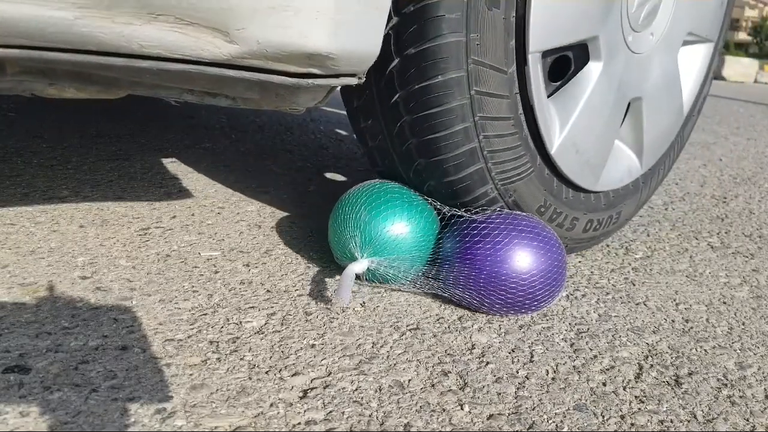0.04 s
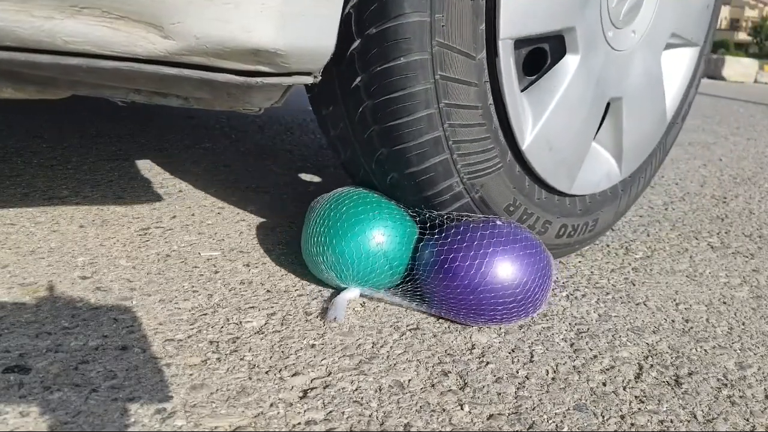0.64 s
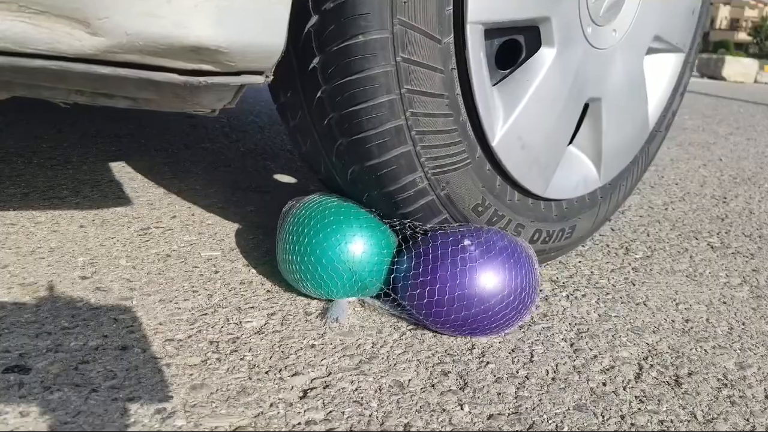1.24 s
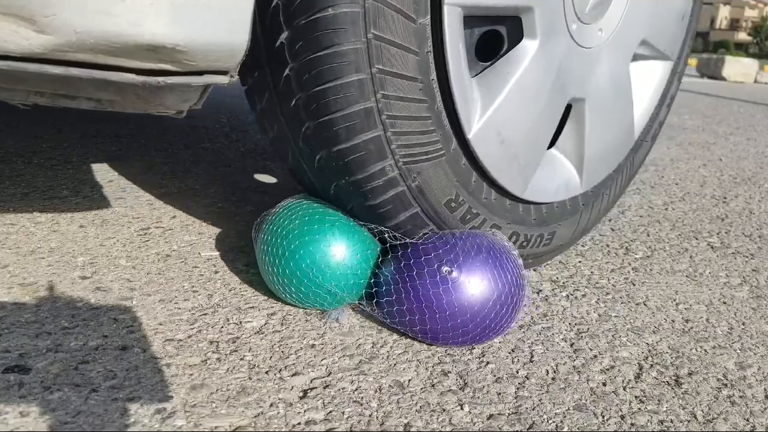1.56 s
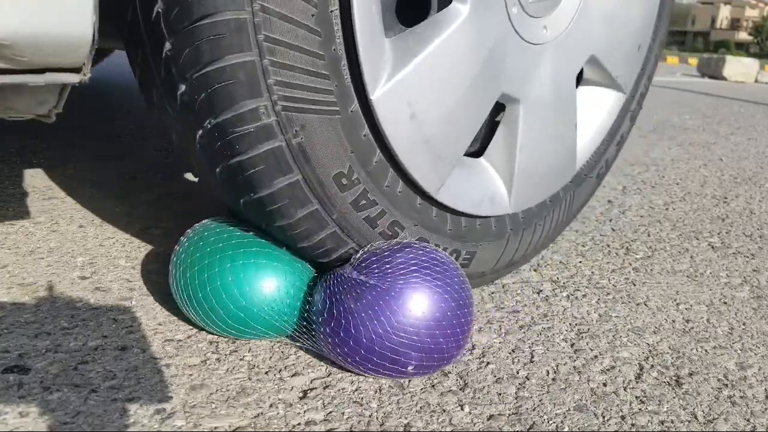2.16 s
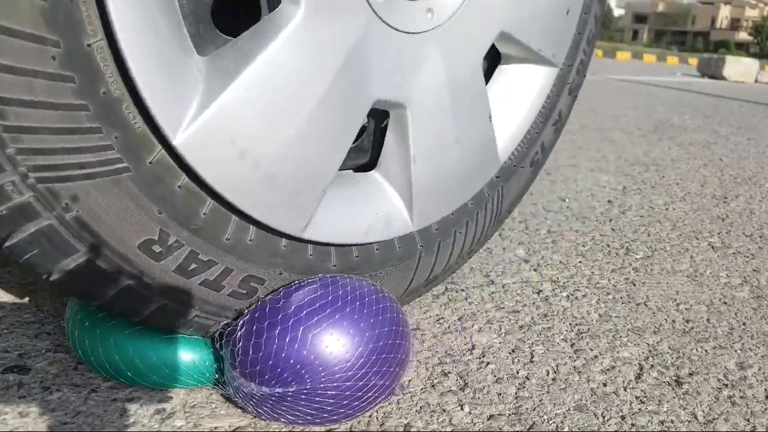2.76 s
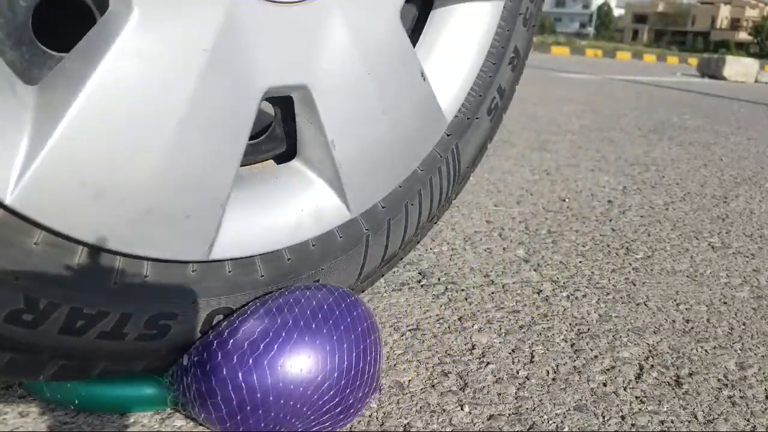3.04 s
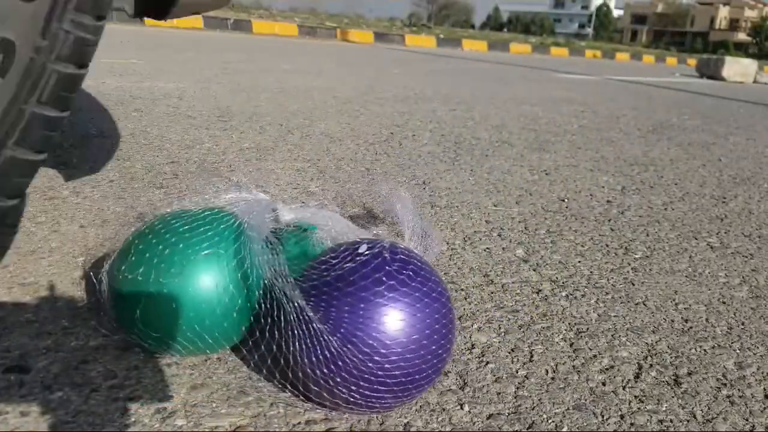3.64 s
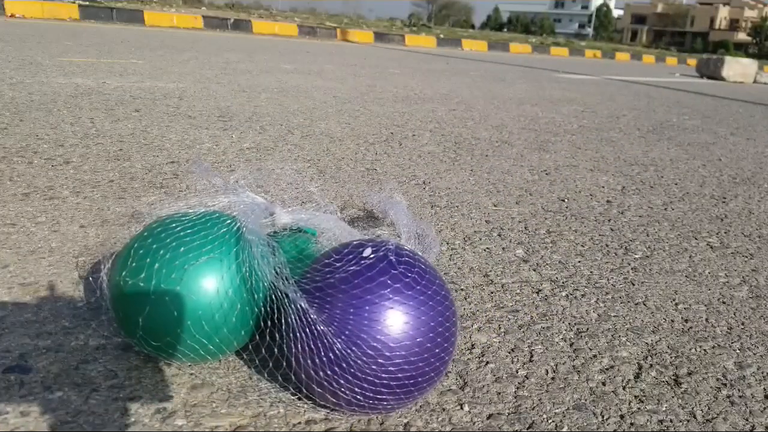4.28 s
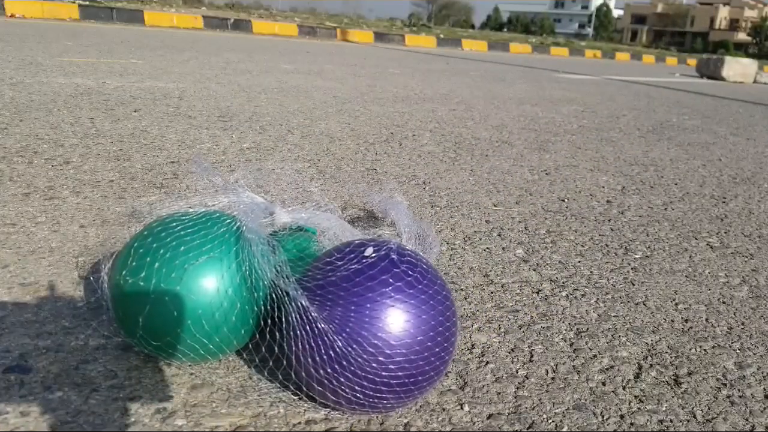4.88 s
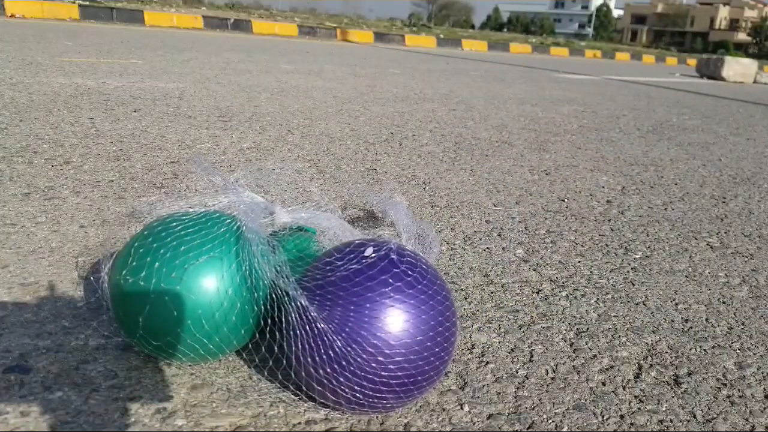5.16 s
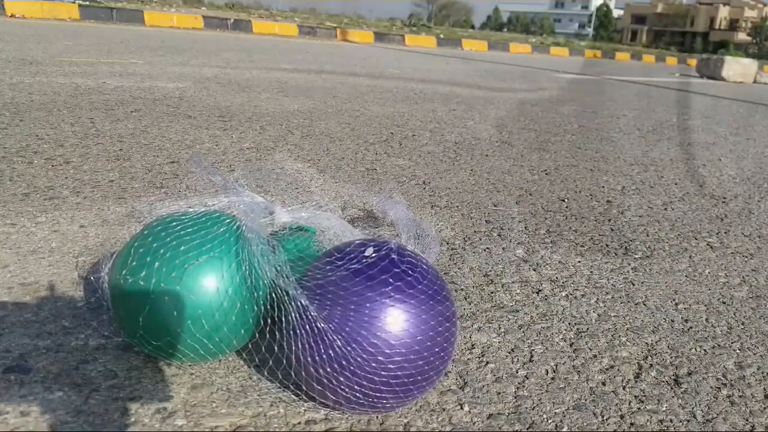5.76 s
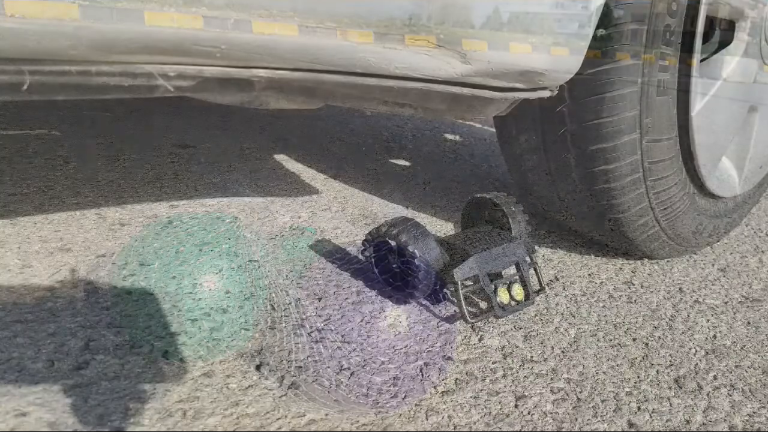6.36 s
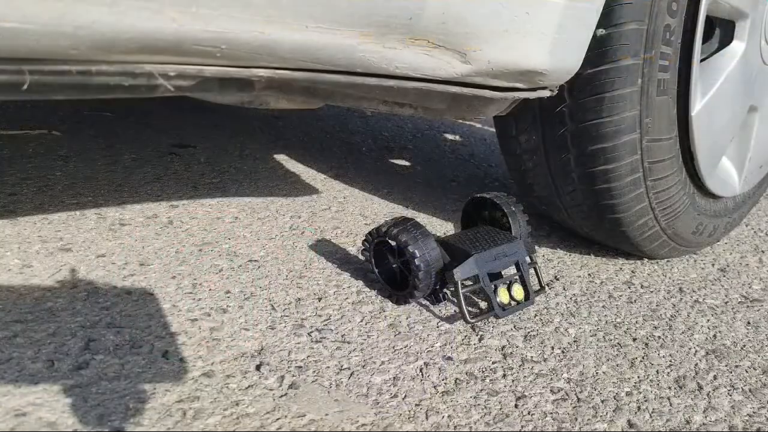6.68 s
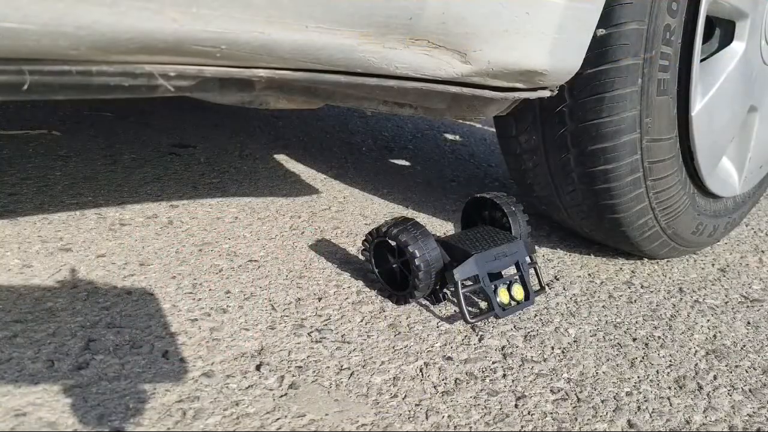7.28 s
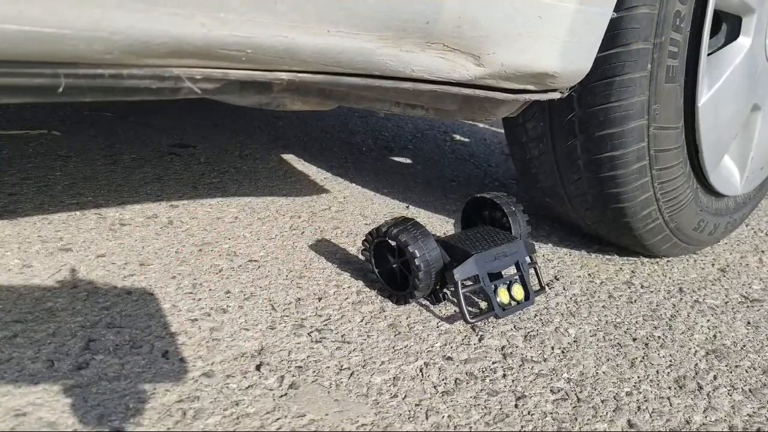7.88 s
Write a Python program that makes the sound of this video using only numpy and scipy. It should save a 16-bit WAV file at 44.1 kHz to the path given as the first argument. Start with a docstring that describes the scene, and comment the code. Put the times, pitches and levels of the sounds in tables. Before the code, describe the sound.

Close to a wheel on an outdoor road, sand and small stones crunch under a slowly rolling tyre over a low engine hum. Rubbery creaks lead to one sharp bang as a ball bursts, then a quick run of dry snaps from breaking netting. After a lull, the brakes squeak, the tyre scuffs, a few low thumps sound and loose metal clanks while the engine idles. Soft gusts brush the stereo microphones.

```python
"""Car rolling onto a net of toy balls

Outdoors on gritty asphalt, a stereo pair close to the tyre, light air on the microphones.
A car creeps up, grit crackling under the tread; one ball creaks and bursts, and the net snaps
strand by strand. The engine drops to idle; a pebble clicks, the brakes squeak, the tyre scuffs,
a few dull thumps sound and loose metal clanks."""
import sys
import numpy as np
from scipy import signal
from scipy.fft import rfft, irfft, next_fast_len
from scipy.io import wavfile

SR = 44100
rng = np.random.default_rng(int(sys.argv[2]) if len(sys.argv) > 2 else 0)


def inscribe(sig):
    """Save sig as 16-bit PCM at rate SR to the path in sys.argv[1].

    A 1-D sig is mono; a 2-D sig holds one channel per row.
    Samples are clipped to [-1, 1] before scaling.
    """
    pcm = np.round(np.clip(np.atleast_2d(sig).T, -1, 1) * 32767)
    wavfile.write(sys.argv[1], SR, pcm.astype(np.int16))


N = 353682
TIME = np.arange(N) / SR
CAR_LEAD_S = 0.000422   # the car's sound reaches the left microphone first
TYRE_LEAD_S = 0.00005   # the tyre meets the balls almost straight ahead

# spectra of cracking grit, a blast at the wheel arch and a dry snap: f/Hz, level/dB
GRIT_SPECTRUM = [(650, -31), (1100, -7), (1570, -3.5), (2150, -2), (2800, -5), (4100, -4), (4900, -1.5),
                 (6000, -9.5), (7300, -13), (8430, -20), (11400, -11.5), (13000, -13), (14500, -22.5),
                 (15500, -41.5)]
BLAST_SPECTRUM = [(59, -35), (100, -13), (150, -7), (220, -11), (333, -8), (411, -4), (600, -12),
                  (727, -4.5), (970, -5.5), (1250, -14), (1800, -10), (2090, -14.5), (6530, -30),
                  (8770, -49.5), (12300, -30.5), (15500, -57.5)]
SNAP_SPECTRUM = [(210, -28), (350, -11), (1030, -2), (2390, -1.5), (4720, -13.5), (5890, -13),
                 (8900, -28.5), (12400, -24.5), (15500, -44)]


def amp(db):
    """Decibels to gain."""
    return 10 ** (np.asarray(db) / 20)


def unit_power(x):
    """Scale to an RMS of one."""
    return x / np.sqrt(np.mean(x ** 2) + 1e-20)


def in_time(points):
    """Read a curve at every sample."""
    return np.interp(TIME, *np.transpose(points))


def between(start, end, fade_s):
    """One inside a span, fading to zero outside."""
    return np.clip(np.minimum(TIME - start, end - TIME) / fade_s + 1, 0, 1)


def at_hz(points, hz):
    """Read a spectrum on a log-frequency axis."""
    f, value = np.transpose(points)
    return np.interp(np.log(hz), np.log(f), value)


def bin_hz(n):
    """Frequencies of an n-point spectrum, 1 Hz at least."""
    return np.maximum(np.arange(n // 2 + 1) * SR / n, 1)


def drift(per_s):
    """Random wander of unit power."""
    knots = rng.standard_normal(int(N / SR * per_s) + 2)
    return unit_power(np.interp(TIME * per_s, np.arange(len(knots)), knots))


def coloured(x, spectrum, tilt_db=0, size=4096):
    """Causal filter of unit energy, tilted per octave and steep below the spectrum's lowest point."""
    hz = bin_hz(size)
    skirt_db = np.clip(24 * np.log2(hz / spectrum[0][0]), -50, 0)
    cepstrum = irfft(np.log(amp(at_hz(spectrum, hz) + skirt_db + tilt_db * np.log2(hz))))
    response = irfft(np.exp(rfft(2 * cepstrum[:size // 2], size)))
    response /= np.sqrt(np.sum(response ** 2))
    return signal.oaconvolve(x, response[None], axes=1)[:, :x.shape[1]]


def spread(paths, lead_s):
    """Three unrelated signals to the pair: one direct, early on the left, and two scattered."""
    common_power = [(60, 0.79), (300, 0.86), (700, 0.38), (2000, 0.49), (12000, 0.28)]   # what both microphones share: f/Hz, fraction of power
    n = next_fast_len(paths.shape[1], real=True)
    hz, bins = bin_hz(n), rfft(paths, n)
    share = np.clip(at_hz(common_power, hz), 0, 1)
    direct = bins[0] * np.exp(-2j * np.pi * hz * lead_s * np.arange(2)[:, None])
    return irfft(np.sqrt(share) * direct + np.sqrt(1 - share) * bins[1:], n)[:, :paths.shape[1]]


def grains(per_s, size_db, count=N, lead_s=CAR_LEAD_S):
    """Stereo stream of tiny fractures of uneven size; unit power."""
    born = rng.random((3, count)) < per_s / SR
    sizes = amp(size_db * np.minimum(rng.exponential(1, (3, count)), 4))
    return unit_power(spread(born * sizes * rng.choice([-1, 1], (3, count)), lead_s))


def noise(lead_s, count=N):
    """Smooth stereo noise."""
    return spread(rng.standard_normal((3, count)), lead_s)


def click(lead_s, count):
    """One sharp stereo pulse, early on the left."""
    return 1.0 * (np.arange(count) == np.round(lead_s * SR * np.arange(2)[:, None]))


def resonate(x, hz, width_hz):
    """One resonance, of gain one at its top."""
    return signal.lfilter(*signal.iirpeak(hz, hz / width_hz, fs=SR), x + 1e-18)


def ring(x, hz, width_hz):
    """One resonance that keeps the power of a broad sound."""
    return resonate(x, hz, width_hz) * np.sqrt(SR / (np.pi * width_hz))


def hollow(x, reflection):
    """The gap between tyre and road returns a sound after about a millisecond."""
    lag = round(rng.uniform(.0007, .0014) * SR)
    return signal.lfilter([np.sqrt(1 - reflection ** 2)], np.r_[1, np.zeros(lag - 1), reflection], x)


def add(out, s, sound):
    """Mix a sound in at a time."""
    i = round(s * SR)
    out[:, i:i + sound.shape[1]] += sound[:, :N - i]


def lull(sink_s, recover_s, from_s=2.555, to_s=3.72):
    """Depth, 0-1, to which the engine's sound sinks after the burst before it swells back."""
    return np.clip(np.minimum((TIME - from_s) / sink_s, 1 - (TIME - to_s) / recover_s), 0, 1)


def engine(idle_hz=14.8, pipe_hz=130, pipe_width_hz=9, pipe_db=2.0, lumpy_db=2.3, throb=0.089):
    """Firing orders swell as they pass the exhaust resonance, over uneven rumble and bay hiss."""
    crank_rate = [(0.0, 16.6), (0.55, 16.4), (0.79, 19.3), (0.96, 20), (1.21, 24.2), (1.5, 25.2),
                  (1.8, 24.8), (2.3, 23), (4.55, 21.3), (5.0, 18.3), (5.55, 14.7), (6.8, 15), (7.5, 14.8),
                  (8.0, 16)]   # crankshaft turns: t/s, rate/Hz
    firing_orders = [(2, -9.5), (3, -8.5), (4, -11.5), (5, -15), (6, -7), (8, -15), (9, -5.5), (11, -16.5),
                     (12, -10), (18, -16.5)]   # engine tones: multiple of the crank rate, level/dB
    rumble_spectrum = [(18, -36), (30, -15), (135, 1), (211, -5.5), (248, -14), (302, -6.5), (400, -19),
                       (520, -35.5), (880, -120)]   # low engine noise: f/Hz, level/dB
    bay_spectrum = [(150, -25), (250, -3.5), (340, -11), (525, -4), (692, -4.5), (1480, -12.5), (2020, -13),
                    (2760, -15.5), (4790, -14.5), (8320, -36.5), (12400, -26), (14200, -36), (15500, -53)]   # engine bay hiss: f/Hz, level/dB
    crank_hz = in_time(crank_rate)
    turn = 2 * np.pi * np.cumsum(crank_hz * (1 + .009 * drift(14))) / SR
    firing = np.sin(2 * turn)
    orders = 0
    for k, db in firing_orders:
        resonance_db = pipe_db / (1 + ((k * crank_hz - pipe_hz) / pipe_width_hz) ** 2)
        strength = amp(db + resonance_db + lumpy_db * drift(8.7))
        orders = orders + strength * np.sin(k * turn + rng.uniform(0, 2 * np.pi))
    rumble = coloured(noise(0), rumble_spectrum) * amp(-4 + lumpy_db * drift(12))
    hiss = coloured(noise(CAR_LEAD_S), bay_spectrum) * (1 + throb * firing)
    # the drone grows with engine speed and fades slowly throughout
    speed_db = 7.5 * np.log2(crank_hz / idle_hz)
    drone_db = -47 + speed_db - 0.39 * TIME - 16.5 * lull(sink_s=0.48, recover_s=0.8)
    bay_db = -60 + 1.113 * TIME - 12.5 * lull(sink_s=1.27, recover_s=0.74)
    tailpipe = amp(-54) * firing * between(4.23, 5.4, fade_s=0.3)   # heard once the wheel has passed
    return amp(drone_db) * (rumble + amp(-0.5) * orders) + amp(bay_db) * hiss + tailpipe


def crackle(lead_s, clump_db=1.8):
    """Sand cracks under the tread; the rubber gives a duller crunch in the same clumps."""
    tread_spectrum = [(190, -20.5), (330, -3), (736, -2.5), (805, -1.5), (1150, -8.5), (1700, -14.5),
                      (2210, -30.5), (3740, -120)]   # crunch of the rubber: f/Hz, level/dB
    sand = coloured(grains(per_s=2600, size_db=2.8, lead_s=lead_s), GRIT_SPECTRUM)
    rubber = coloured(grains(per_s=2600, size_db=2.8, lead_s=lead_s), tread_spectrum)
    return (sand + amp(-1) * rubber) * amp(clump_db * drift(90))


def rolling(climb_s=2.6):
    """Grit crackles under the car, swelling with each tread block, until the tyre climbs the ball."""
    roll_level = [(0, -57), (0.6, -55.5), (1.15, -50), (2.5, -49.5)]   # steady crackle as the car gathers speed: t/s, level/dB
    bites = [(0.767, -45, 0.047), (1.033, -50, 0.048), (1.243, -50.5, 0.057), (1.454, -45.5, 0.063),
             (1.714, -42.5, 0.072), (1.85, -44.5, 0.046), (2.025, -40, 0.049), (2.2, -37.5, 0.043),
             (2.375, -37.5, 0.059), (2.521, -38.5, 0.047)]   # blocks of the near tyre biting in: t/s, level/dB, half length/s
    bite_power = sum(amp(2 * db) * np.exp(-2 * ((TIME - s) / half_s) ** 2) for s, db, half_s in bites)
    steady = amp(in_time(roll_level)) * crackle(CAR_LEAD_S)
    near = np.sqrt(bite_power) * crackle(TYRE_LEAD_S)
    return (steady + near) * between(0, climb_s, fade_s=0.084)


def breeze(band_hz=(31, 90), flutter_db=5.5):
    """Light air buffets the microphones in a few soft gusts."""
    gusts = [(0.095, -53, 0.46), (0.877, -49.5, 0.17), (5.2, -53, 0.4)]   # puffs of air: t/s, level/dB, half length/s
    buffet = signal.sosfilt(signal.butter(2, band_hz, "band", fs=SR, output="sos"), noise(0))
    swell = sum(amp(db) / (1 + ((TIME - s) / half_s) ** 4) for s, db, half_s in gusts)
    return unit_power(buffet) * swell * amp(flutter_db * drift(14))


def stones(crack_db=17, t60=0.031, count=2500):
    """Larger stones split: one crack and a quick run of smaller ones, ringing at the stone's pitch."""
    splits = [(0.746, -32, 4520), (1.0388, -33, 2340), (1.1945, -31, 4790), (1.2548, -30, 4850),
              (1.3965, -30.5, 2480), (1.464, -27.5, 3800), (1.6714, -26.5, 5070), (1.7198, -29, 4780),
              (1.7542, -25.5, 4640), (1.8206, -26.5, 3910), (1.851, -25, 3580), (1.9543, -32, 2270),
              (1.9725, -29.5, 4550), (2.0238, -17.5, 2620), (2.1118, -33.5, 3720), (2.1476, -28, 2300),
              (2.1613, -25, 1900), (2.2044, -24, 2600), (2.3094, -29, 1560)]   # stones under the tread: t/s, level/dB, f/Hz
    out, t = np.zeros((2, N)), np.arange(count) / SR
    for s, db, hz in splits:
        run = grains(per_s=6000, size_db=1.5, count=count, lead_s=TYRE_LEAD_S) * amp(-60 * t / t60)
        split = run + amp(crack_db) * click(TYRE_LEAD_S, count)
        sand = amp(-3) * coloured(split, GRIT_SPECTRUM, tilt_db=-0.7)
        tone = amp(-6) * ring(resonate(split, hz, hz), hz, hz / 2)
        add(out, s, amp(db - 8.5) * hollow(sand + tone, reflection=0.32))
    return out


def creaks(jolt_db=10, skin_db=16.5, count=12000):
    """The squeezed ball lets go with a jolt that rings its taut skin, then runs on in stick and slip."""
    jolts = [(1.463, -32.5, 0.05, 912), (2.402, -23.5, 0.05, 1090), (2.409, -24.5, 0.025, 945),
             (2.483, -25.5, 0.017, 2090), (2.492, -24, 0.2, 430), (2.517, -17, 0.093, 840),
             (2.5278, -19.5, 0.052, 749), (2.538, -18, 0.073, 1030), (2.560, -23, 0.12, 1000)]   # the ball slipping under the tread: t/s, level/dB, t60/s, skin f/Hz
    creak_spectrum = [(88, -38), (150, -9), (221, -8.5), (400, -5.5), (560, -8), (736, -5.5), (1040, 1),
                      (1400, -16), (1910, -10), (2600, -16.5), (4930, -15), (8830, -35.5), (12800, -26.5),
                      (15500, -54)]   # rubbing skin: f/Hz, level/dB
    out, t = np.zeros((2, N)), np.arange(count) / SR
    jolt = click(TYRE_LEAD_S, count)
    for s, db, t60, hz in jolts:
        slips = grains(per_s=3000, size_db=3.5, count=count, lead_s=TYRE_LEAD_S) * amp(-60 * t / t60)
        rub = coloured(slips + amp(jolt_db) * jolt, creak_spectrum)
        skin = amp(skin_db) * ring(jolt, hz, width_hz=170)
        add(out, s, amp(db - 0.5) * (rub + skin))
    return out * between(0, 2.582, fade_s=.006)


def burst(at_s=2.5995, taut_hz=1150, slack_hz=410, sag_s=0.0034, echo_s=0.028, echo_width_s=0.023,
          blast_t60=0.05, skin_t60=0.051, tail_t60=0.37, count=22000):
    """The skin tears and flaps lower as it slackens; the blast rings the wheel arch and dies dull."""
    arch_modes = [(400, 5, 0.14), (543, -6, 0.17), (636, -8.5, 0.22), (742, -5, .18), (900, -9, 0.2),
                  (1018, -6, 0.22), (1179, -8, 0.16), (1390, -13, 0.25), (1809, -8, 0.22)]   # wheel arch and tyre: f/Hz, level/dB, t60/s
    out, t = np.zeros((2, N)), np.arange(count) / SR
    crack = amp(13.5) * (t == 0)
    air = noise(TYRE_LEAD_S, count) * amp(-4 - 60 * t / blast_t60)
    blast = coloured(crack + air, BLAST_SPECTRUM)
    flap_hz = slack_hz + (taut_hz - slack_hz) * np.exp(-(t / sag_s) ** 2)
    skin = np.sin(2 * np.pi * np.cumsum(flap_hz) / SR) * amp(-2 - 60 * t / skin_t60)
    arch = sum(np.sin(2 * np.pi * hz * t) * amp(db - 20 - 60 * t / t60) for hz, db, t60 in arch_modes)
    echo_swell = amp(-21) * np.exp(-((t - echo_s) / echo_width_s) ** 2)
    underbody_echo = coloured(noise(CAR_LEAD_S / 2, count) * echo_swell, BLAST_SPECTRUM)
    tail = coloured(noise(0, count) * amp(-24.5 - 60 * t / tail_t60), BLAST_SPECTRUM, tilt_db=-3.5)
    pan = amp([[2], [-2]])   # the tear is left of the wheel
    add(out, at_s, (blast + skin) * pan + arch + underbody_echo + tail)
    return out


def net_snaps(recoil=0.22, recoil_s=.0008, t60=0.064, lead_s=0.00015, count=8000):
    """Each strand parts with a sharp pulse, its recoil and a short scatter between tyre and road."""
    strands = [(2.817, -49, 7), (2.8657, -16, -1.7), (2.920, -28.5, -1), (2.9401, -24.5, 0),
               (2.9616, -29, 2), (2.977, -27, 0.5), (3.0032, -25.5, 2), (3.0058, -27.5, -0.5),
               (3.0488, -29.5, 0.5), (3.064, -30.5, 1), (3.0952, -30.5, 0.5)]   # strands breaking: t/s, level/dB, tilt/(dB per octave)
    out, t = np.zeros((2, N)), np.arange(count) / SR
    crack = amp(15.5) * click(lead_s, count)
    pulse = crack - recoil * np.roll(crack, round(recoil_s * SR), axis=1)
    for s, db, tilt_db in strands:
        scatter = noise(lead_s, count) * amp(-9.3 - 60 * t / t60)
        snap = coloured(pulse + scatter, SNAP_SPECTRUM, tilt_db)
        add(out, s, amp(db) * hollow(snap, reflection=0.3))
    return out


def scuffs(t60=0.14, rattle_db=3.5, count=12000):
    """The tyre drags a little sand: a rattling run of grains that sets the tyre ringing."""
    drags = [(3.285, -53, 0.065, 0.08, -1.5), (5.124, -63, 0.018, 0.071, 5),
             (5.395, -51, 0.016, 0.064, -0.5), (5.425, -37.5, 0.0063, 0.066, -3.0),
             (6.828, -44, 0.0022, 0.012, -0.5), (7.057, -50.5, 0.0046, 0.016, -4.5),
             (7.324, -43, 0.004, 0.011, -2), (7.601, -41, 0.0025, 0.005, -3)]   # tyre on grit: t/s, level/dB, rise/s, length/s, tilt/(dB per octave)
    scuff_spectrum = [(120, -26), (200, -12), (812, -13.5), (3610, -14.5), (4030, -12), (5200, -16.5),
                      (6200, -20), (7480, -21), (9140, -25.5), (13200, -14), (15500, -36)]   # dragged sand: f/Hz, level/dB
    tyre_modes = [(810, 6.5, 49), (4100, -5.5, 130)]   # resonances of the tyre: f/Hz, level/dB, width/Hz
    out, t = np.zeros((2, N)), np.arange(count) / SR
    for s, db, rise_s, length_s, tilt_db in drags:
        decay_db = 60 * np.maximum(t - length_s, 0) / t60
        drag = np.minimum(t / rise_s, 1) * amp(db - decay_db + rattle_db * drift(256)[:count])
        sand = grains(per_s=4000, size_db=-0.5, count=count) * drag
        rings = sum(amp(mode_db) * resonate(sand, hz, width) for hz, mode_db, width in tyre_modes)
        add(out, s, hollow(coloured(sand + rings, scuff_spectrum, tilt_db), reflection=0.34))
    return out


def hum(hz=129.2, waver_db=2.5):
    """A low note that wavers in strength while the car slows."""
    phase = 2 * np.pi * hz * (TIME - CAR_LEAD_S * np.arange(2)[:, None])
    return np.sin(phase) * amp(-47 + waver_db * drift(23)) * between(4.26, 5.1, fade_s=0.13)


def pebble(at_s=4.5595, bounce_s=0.0022, t60=0.05, count=3000):
    """A hard click, as of a pebble shot from under the tyre, with a dull note from the wheel arch."""
    out, t = np.zeros((2, N)), np.arange(count) / SR
    strike = amp(24) * click(CAR_LEAD_S, count)
    bounce = 0.45 * np.roll(strike, round(bounce_s * SR), axis=1)
    scatter = noise(CAR_LEAD_S, count) * amp(-5 - 60 * t / t60)
    blow = strike + bounce + scatter
    snap = ring(coloured(blow, SNAP_SPECTRUM), hz=2950, width_hz=900) / 2
    arch = amp(-3) * coloured(blow, BLAST_SPECTRUM)
    add(out, at_s, amp(-37) * (snap + arch))
    return out


def brakes(attack_s=0.011, release_s=0.036, waver_hz=14, chatter_db=3.0, count=14000):
    """A pad sings on its disc: each note slides up or holds its pitch, chatters and lets go."""
    # squeaks: t/s, length/s, starting f/Hz, rise/(Hz per s), fundamental/dB, third harmonic/dB
    squeaks = [(4.6, 0.19, 2479, 0, -62, -90), (5.289, 0.029, 2095, 2400, -39.5, -61),
               (5.345, 0.052, 2142, 0, -62, -52.5), (7.366, 0.03, 2060, 2400, -38, -64),
               (7.43, 0.19, 2134, 0, -56, -64.5), (7.43, 0.13, 5255, 0, -64.5, -120)]
    out, t = np.zeros((2, N)), np.arange(count) / SR
    for s, length_s, pitch_hz, rise, low_db, high_db in squeaks:
        hz = pitch_hz + rise * t + waver_hz * drift(297)[:count]
        phase = 2 * np.pi * (np.cumsum(hz) / SR - pitch_hz * CAR_LEAD_S * np.arange(2)[:, None])
        low = np.sin(phase) + amp(-12) * np.sin(2 * phase)
        high = np.sin(3 * phase) + amp(-14) * np.sin(4 * phase) + amp(-3.5) * np.sin(6 * phase)
        low *= amp(low_db + chatter_db * drift(70)[:count])
        high *= amp(high_db + chatter_db * drift(70)[:count])
        envelope = np.clip(np.minimum(t / attack_s, 1 + (length_s - t) / release_s), 0, 1) ** 2
        add(out, s, envelope * (low + high))
    return out


def knocks(count=8000):
    """Each small knock shakes one steep-sided resonance of the chassis."""
    chassis_knocks = [(4.912, -37.5, 458, 110, 0.13), (6.829, -35.5, 240, 300, 0.14),
                      (7.325, -40.5, 560, 500, 0.11), (7.603, -37.5, 480.5, 500, 0.074)]   # t/s, level/dB, f/Hz, width/Hz, t60/s
    out, t = np.zeros((2, N)), np.arange(count) / SR
    for s, db, hz, width_hz, t60 in chassis_knocks:
        shake = resonate(noise(CAR_LEAD_S, count), hz, width_hz)
        body = unit_power(resonate(shake, hz, width_hz))
        add(out, s, body * amp(db - 60 * t / t60))
    return out


def thumps(count=22000):
    """Soft, low thumps that swell and shudder out."""
    blows = [(5.543, -20.5, 0.0044, 0.051, -5), (5.724, -25, 0.0053, 0.37, 0.5),
             (5.752, -23.5, 0.013, 0.45, -4.5), (6.076, -31.5, 0.0025, 0.18, -2.5)]   # dull blows: t/s, level/dB, rise/s, t60/s, tilt/(dB per octave)
    thump_spectrum = [(18, -63), (30, -12), (113, -2.5), (202, -14.5), (265, -13.5), (510, -20.5),
                      (583, -25.5), (3000, -44), (3900, -44), (6600, -120)]   # their deep colour: f/Hz, level/dB
    out, t = np.zeros((2, N)), np.arange(count) / SR
    for s, db, rise_s, t60, tilt_db in blows:
        push = noise(0, count) * amp(db - 60 * t / t60) * (1 - np.exp(-t / rise_s))
        add(out, s, coloured(push, thump_spectrum, tilt_db))
    return out


def clanks(strike_db=20, uneven_db=2, count=6000):
    """Loose metal is struck and chatters; each blow shares itself differently among the modes."""
    strikes = [(6.829, -46.5, 0.09), (7.326, -47, 0.08)]   # blows under the car: t/s, level/dB, chatter t60/s
    metal_modes = [(1338, -3, 120), (2880, -2, 110), (3500, -7, 300), (4254, -4, 120), (5275, -4, 160),
                   (6600, -8, 350)]   # resonances of the metal: f/Hz, level/dB, width/Hz
    out, t = np.zeros((2, N)), np.arange(count) / SR
    for s, db, t60 in strikes:
        chatter = noise(CAR_LEAD_S, count) * amp(-60 * t / t60)
        blow = amp(strike_db) * click(CAR_LEAD_S, count) + chatter
        for hz, mode_db, width_hz in metal_modes:
            mode = ring(resonate(blow, hz, hz / 2), hz, width_hz)
            add(out, s, amp(db + mode_db + uneven_db * rng.standard_normal()) * mode)
    return out


def scene():
    """All sources at the pair; the level dips just before the burst and after the first thump."""
    dips = [(2.588, 2.591, -9), (5.607, 5.631, -26.5)]   # brief drops in level: from t/s, to t/s, gain/dB
    dip = amp(sum(db * between(start, end, fade_s=0.011) for start, end, db in dips))
    car = engine() + hum() + rolling() + stones() + scuffs() + thumps()
    car += knocks() + pebble() + clanks() + brakes()
    return dip * (car + creaks() + breeze()) + burst() + net_snaps()


def record(dry, ceiling=0.47, left_trim_db=1.5, cutoff_hz=15600):
    """The right microphone is the louder one; the burst overloads both; the top is cut."""
    balance = [(60, -7), (150, -11), (380, -13), (950, -14.5), (2380, -17), (5980, -17), (15000, -8)]   # lean of the pair before the trim: f/Hz, left minus right/dB
    n = next_fast_len(N, real=True)
    ratio = amp(left_trim_db + at_hz(balance, bin_hz(n)))
    gains = 2 * np.array([ratio, np.ones_like(ratio)]) / (1 + ratio)
    heard = irfft(rfft(dry, n) * gains, n)[:, :N]
    overloaded = ceiling * np.tanh(heard / ceiling)
    return signal.sosfilt(signal.ellip(10, .1, 90, cutoff_hz, fs=SR, output="sos"), overloaded)


dry = scene()
out = record(dry)
inscribe(out)
```